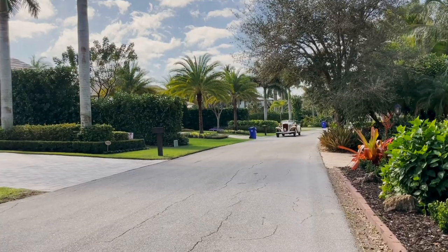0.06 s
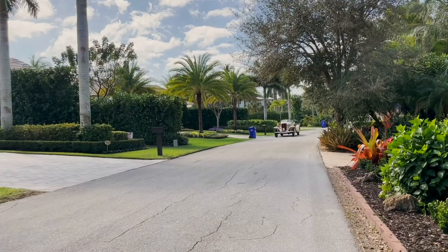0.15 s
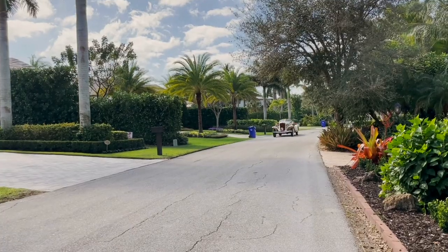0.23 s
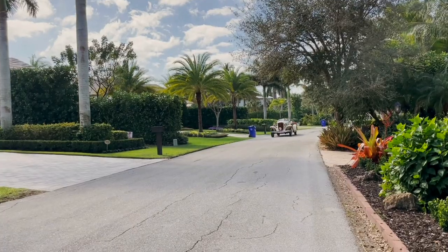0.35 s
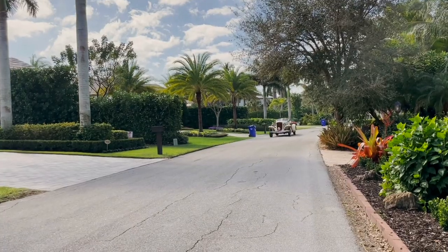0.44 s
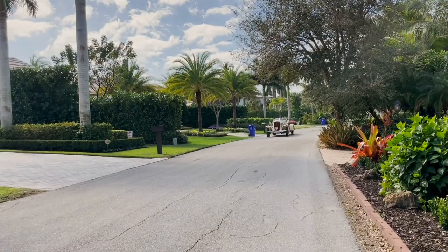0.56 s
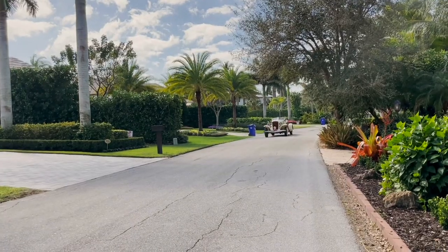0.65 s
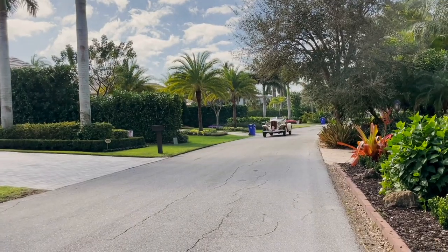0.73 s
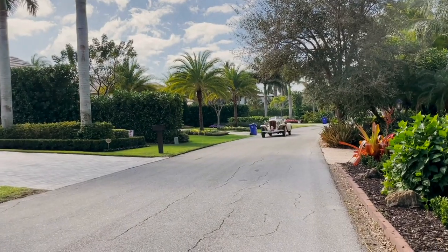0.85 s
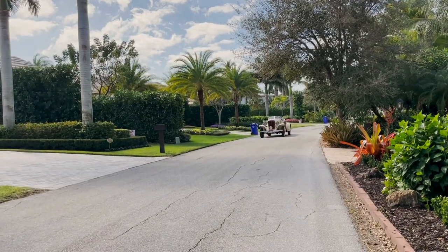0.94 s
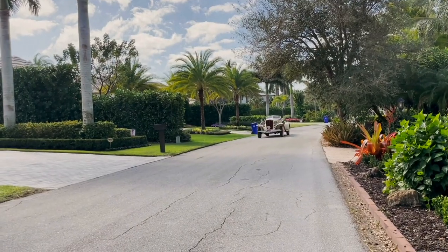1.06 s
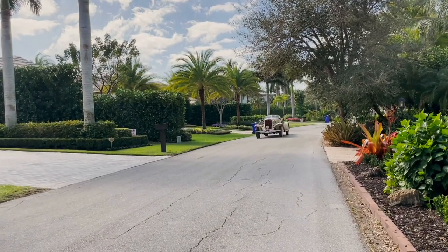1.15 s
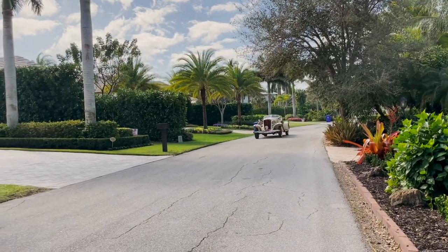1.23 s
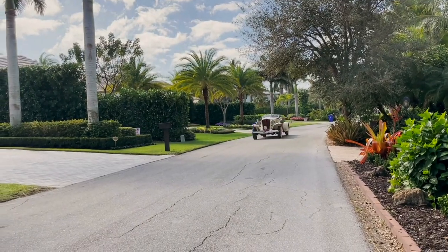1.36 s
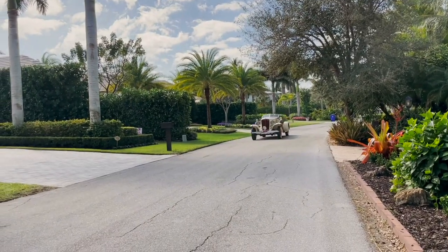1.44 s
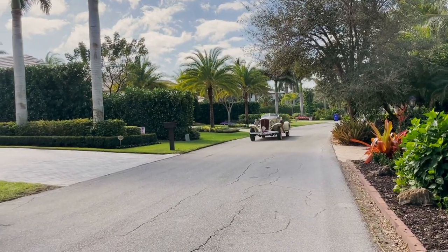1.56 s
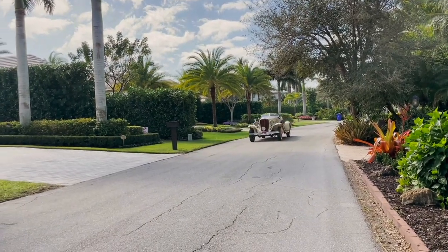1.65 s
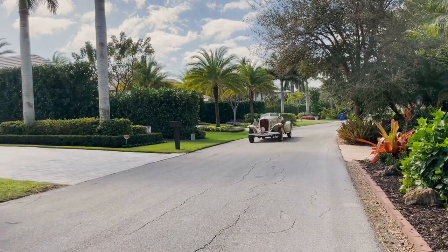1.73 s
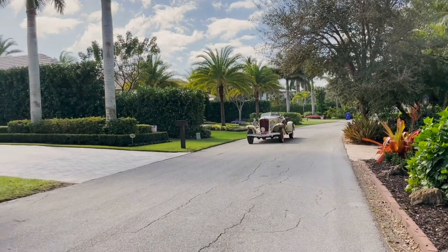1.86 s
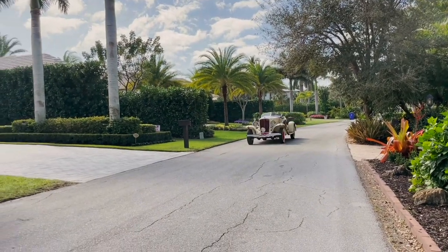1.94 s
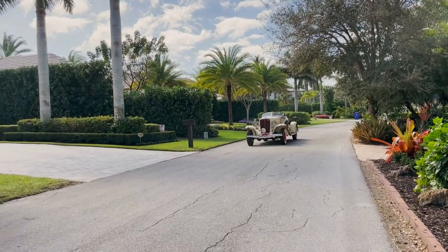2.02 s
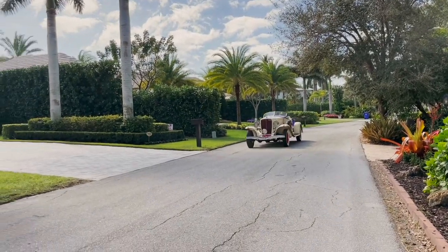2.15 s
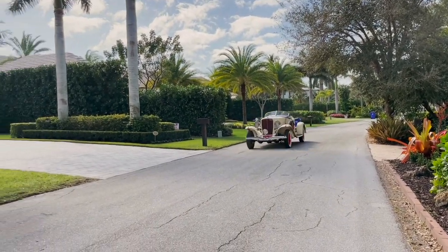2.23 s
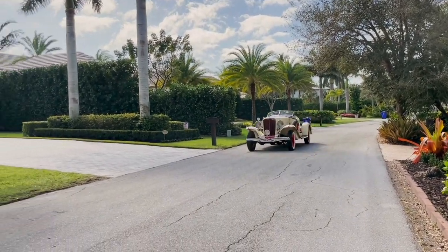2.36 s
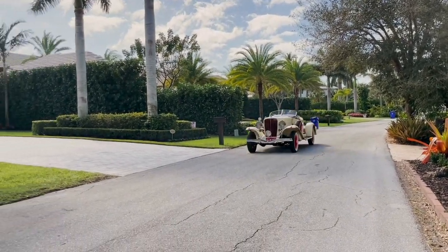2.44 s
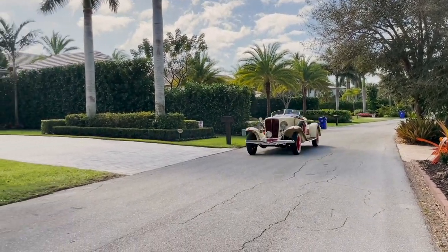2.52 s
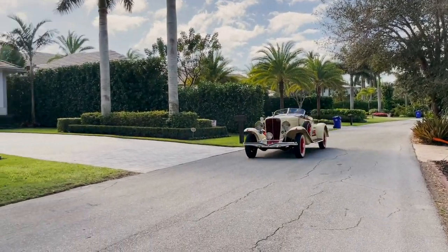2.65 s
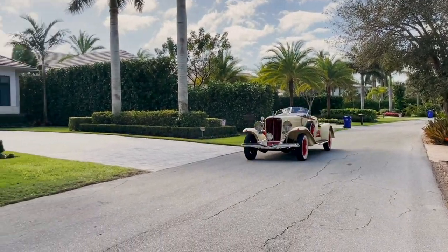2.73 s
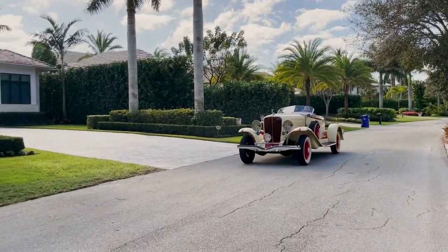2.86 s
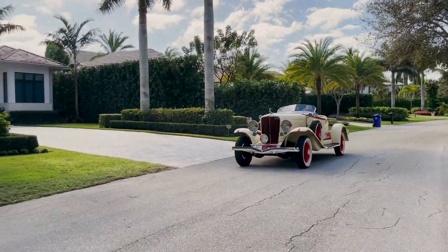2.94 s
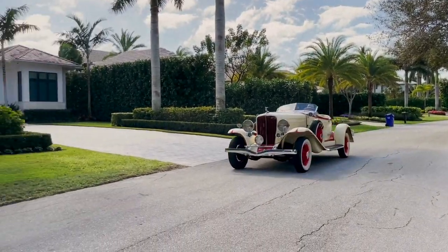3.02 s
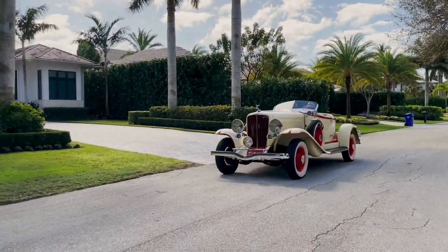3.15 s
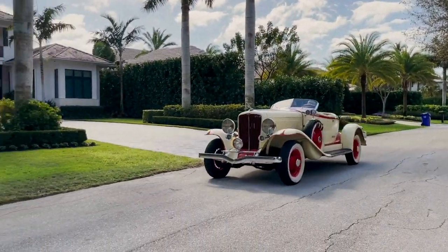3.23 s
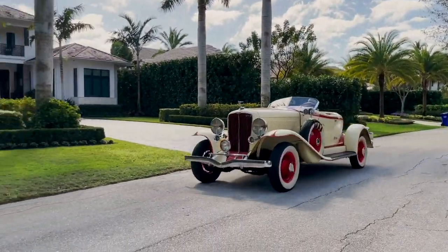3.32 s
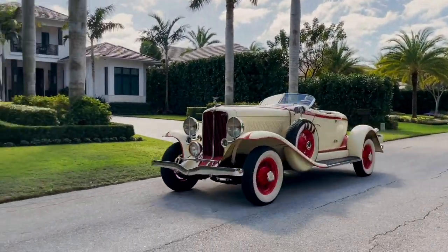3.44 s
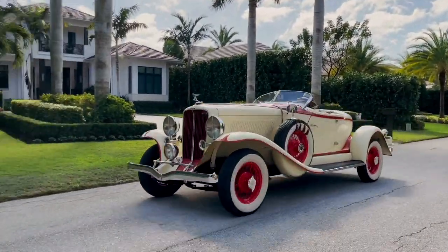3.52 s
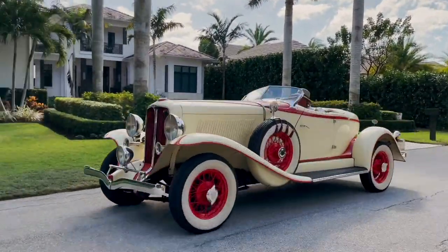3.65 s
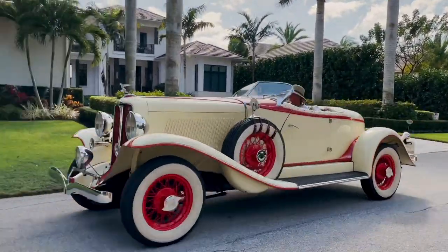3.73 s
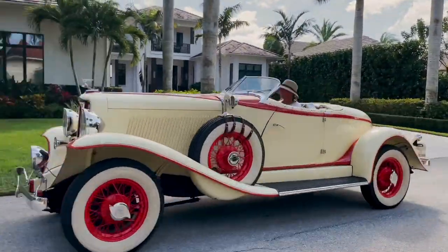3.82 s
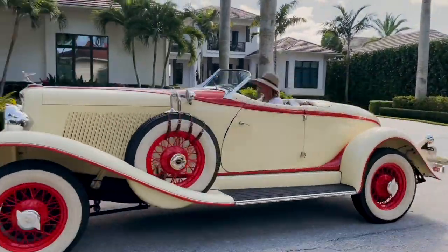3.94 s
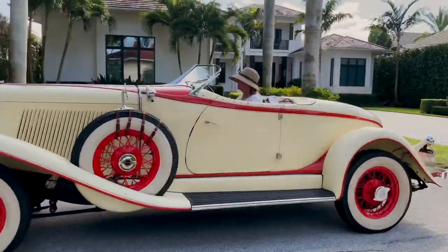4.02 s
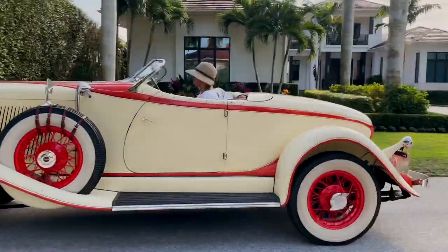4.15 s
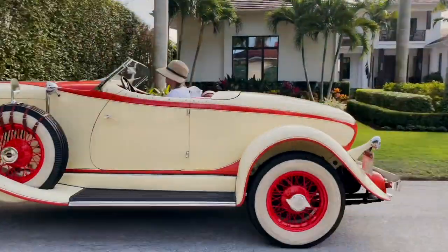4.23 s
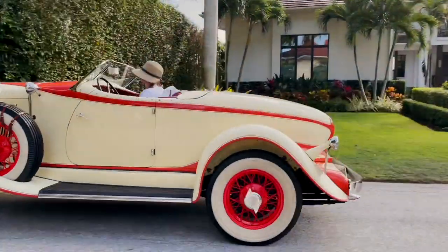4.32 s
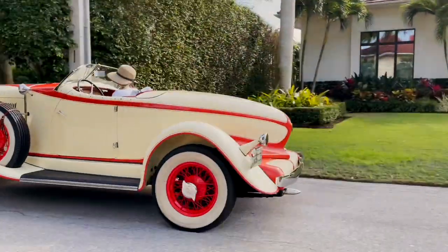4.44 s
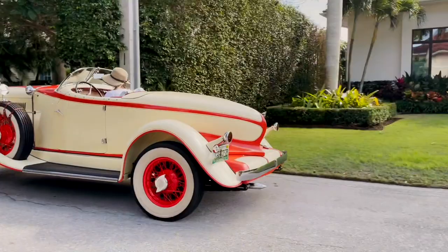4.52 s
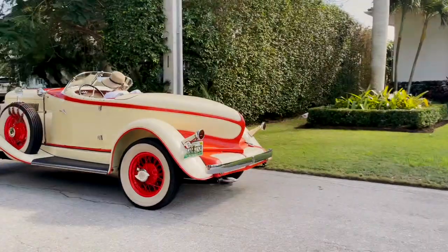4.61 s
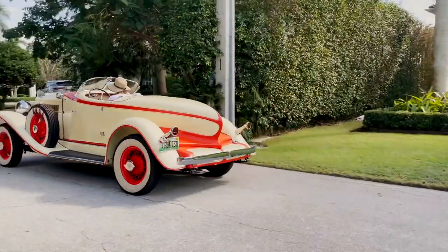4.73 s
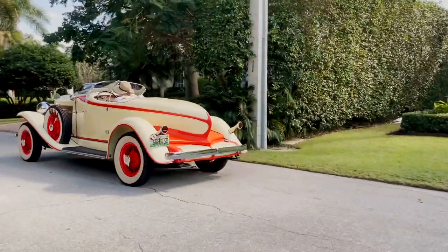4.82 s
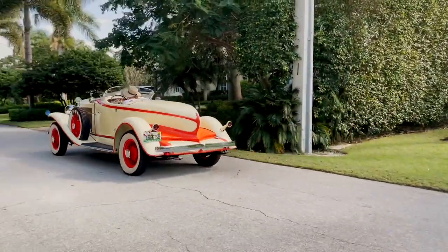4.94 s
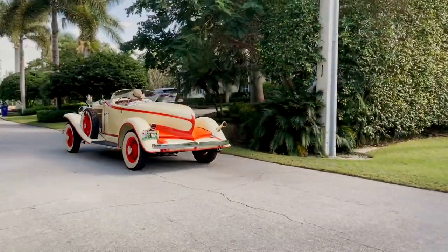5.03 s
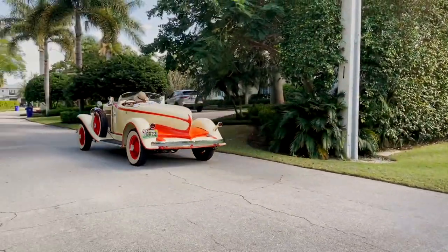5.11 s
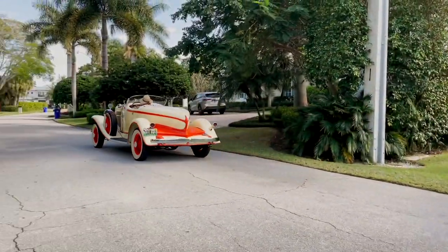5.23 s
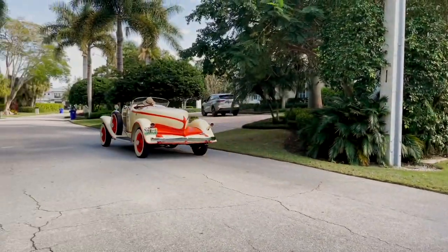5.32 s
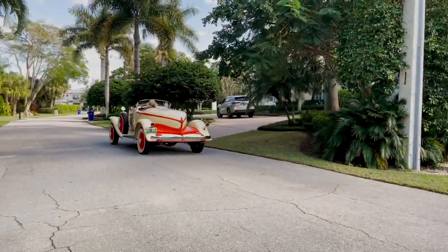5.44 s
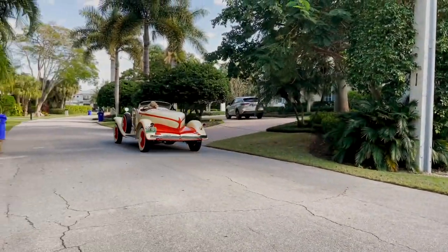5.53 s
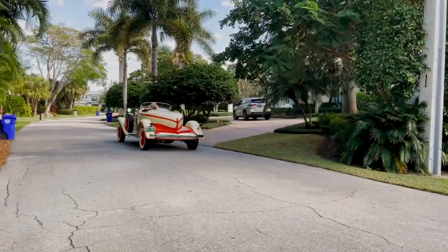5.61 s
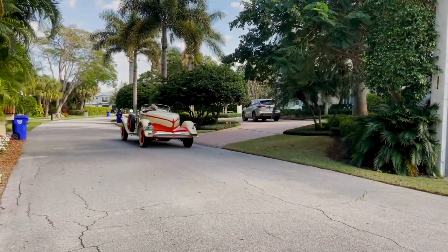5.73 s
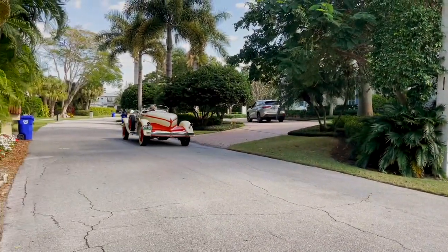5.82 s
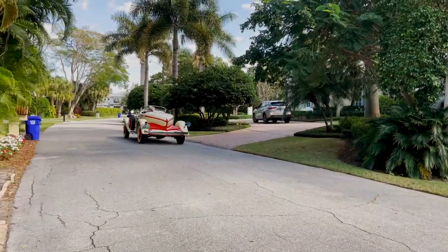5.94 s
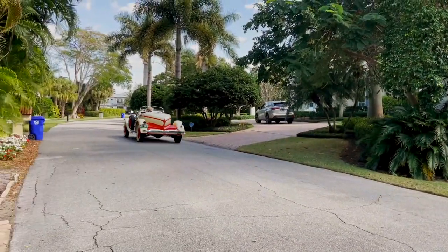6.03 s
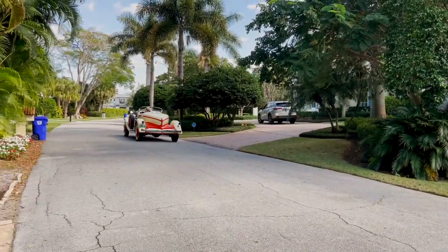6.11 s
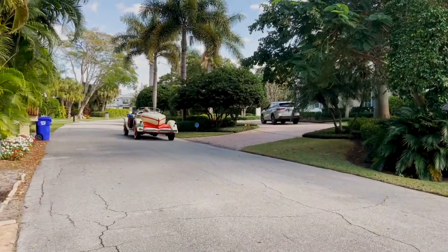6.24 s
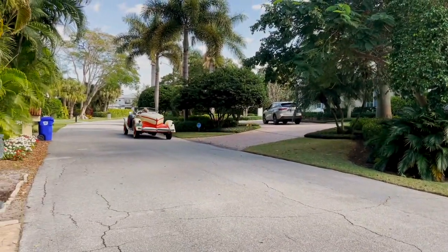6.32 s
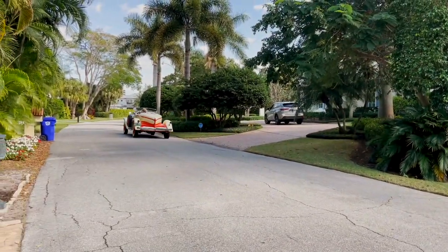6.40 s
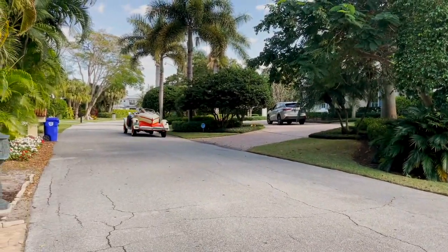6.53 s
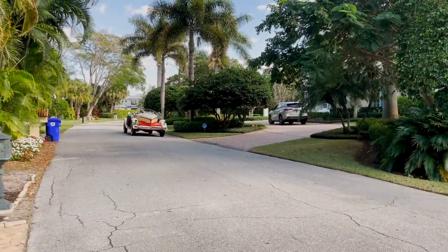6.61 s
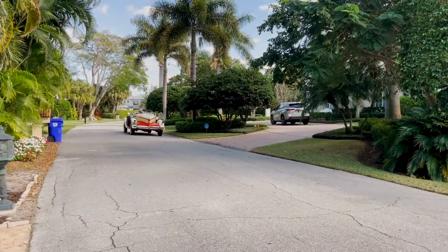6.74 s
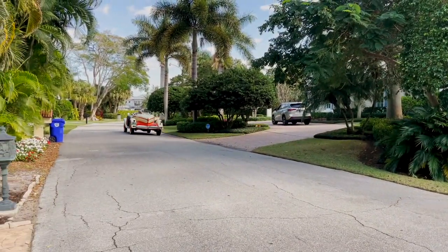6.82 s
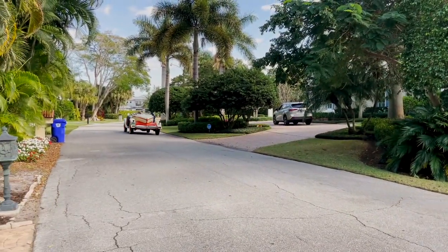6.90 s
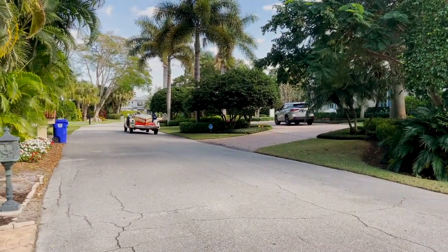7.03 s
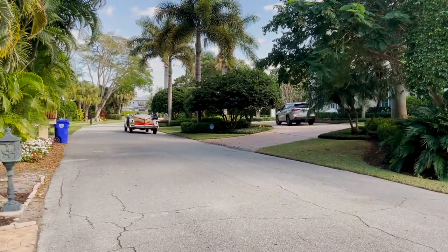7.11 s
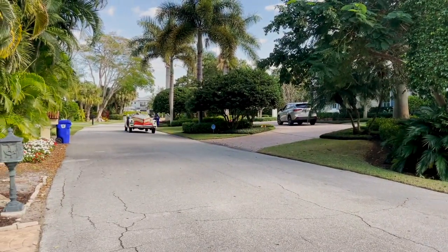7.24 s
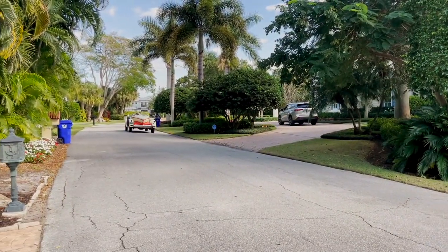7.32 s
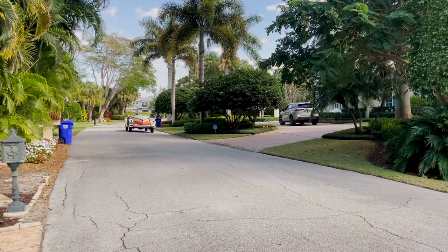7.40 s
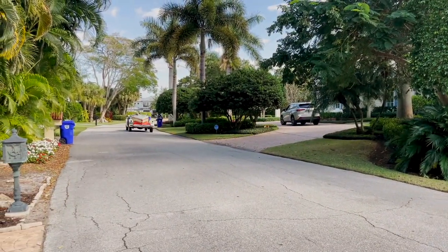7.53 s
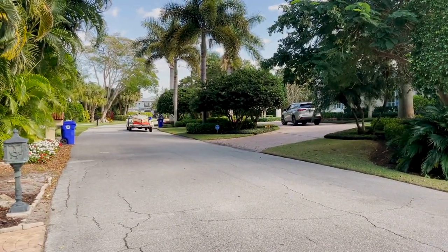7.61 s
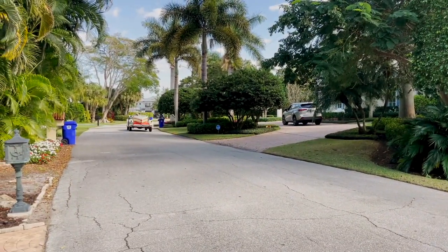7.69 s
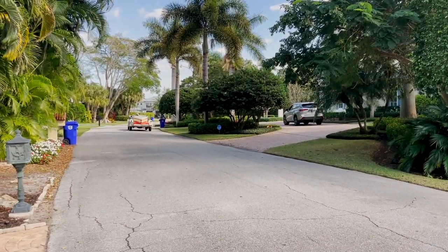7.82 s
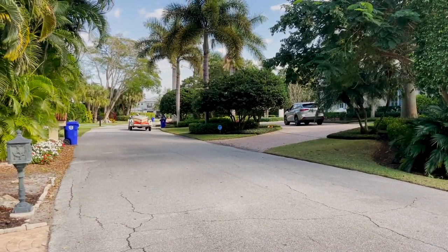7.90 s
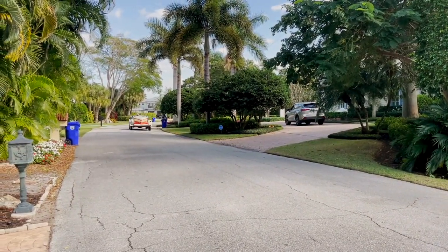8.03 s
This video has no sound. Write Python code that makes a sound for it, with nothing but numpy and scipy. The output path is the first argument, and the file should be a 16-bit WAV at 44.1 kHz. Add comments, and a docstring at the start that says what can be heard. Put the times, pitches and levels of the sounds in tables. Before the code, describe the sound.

Heard from the roadside, an old car accelerates closer with a hollow engine hum and tyre noise while gusts thump on the microphone. It sweeps past at close range, then the tail pipe takes over with a low, steady drone and a short run of raspy sputters. The sound recedes down the quiet street, leaving a thin, faint bird call and one last puff of wind.

```python
"""A quiet street: a vintage straight-eight car accelerates, passes close by and drives away.
Tyres and engine bay rush as it nears (coloured noise, hollow hums). Once the body clears the tail pipe,
the exhaust drones (engine orders) and chuffs (gas bursts ringing the pipe's modes).
A breeze buffets the microphone; a far bird calls thinly at the end."""
import sys
import numpy as np
from scipy import signal
from scipy.fft import rfft, irfft
from scipy.io import wavfile
from scipy.ndimage import uniform_filter1d

SR = 44100
rng = np.random.default_rng(int(sys.argv[2]) if len(sys.argv) > 2 else 0)


def store_pcm(level_fs):
    """Save levels as 16-bit WAV."""
    pcm = np.round(np.clip(level_fs, -1, 1) * 32767).astype(np.int16)
    wavfile.write(sys.argv[1], SR, np.atleast_2d(pcm).T)


N = 355578
T = np.arange(N) / SR
PASS_S, SPEED_M_PER_S, GAP_M, SOUND_M_PER_S = 4.3, 6.9, 3.8, 343

# Left-right likeness of the noise. Each row: frequency in Hz, coherence 0-1.
COHERENCE = [(60, 0.8), (150, 0.88), (380, 0.92), (950, 0.75), (2400, 0.63), (4800, 0.7), (6000, 0.28)]
# Noise spectra. Each row: frequency in Hz, relative density in dB.
WIND_SPECTRUM = [(20, -31), (35, -42), (50, 4), (75, 3.5), (110, 0.5), (170, -6.5), (280, -11), (450, -36),
                 (900, -87)]
FIZZ_SPECTRUM = [(8500, -64), (10000, 7), (11000, 9.5), (15000, 8), (16000, 2)]
AIR_SPECTRUM = [(6000, -36), (7100, -1.5), (8300, 2.5), (9500, -1.5), (10600, -5), (11500, -17),
                (12400, -40)]
WHIRR_SPECTRUM = [(1300, -20), (2100, 2.5), (2600, 0.5), (3200, -8), (4900, -6.5), (5700, -12), (7000, -10),
                  (8200, -27), (9000, -70)]
APPROACH_SPECTRUM = [(70, -39), (160, -2), (220, -4.5), (300, -3.5), (390, -6.5), (590, -5.5), (790, -9),
                     (1000, -7), (1300, -12.5), (2150, -18), (3200, -28.5), (4800, -26.5), (6000, -45.5),
                     (7200, -39), (9000, -92)]
CLOSE_SPECTRUM = [(120, -3), (200, -3), (293, -7.5), (387, -4.5), (550, -3.5), (714, -3.5), (810, -6.5),
                  (1260, -3.5), (2970, -25), (5000, -37.5), (5650, -45.5), (7010, -40), (7800, -41.5),
                  (10100, -114), (17200, -120)]
WAKE_SPECTRUM = [(60, -11), (130, 6.5), (260, 1.5), (380, 1.5), (520, 2.5), (750, -0.5), (1000, 0),
                 (1130, -5), (1300, -2.5), (1500, -5.5), (2000, -14), (2700, -21), (3500, -21), (5000, -31),
                 (7500, -38.5), (9500, -74)]
# Bird call. Each row: time in seconds, lower partial in Hz, upper partial in Hz, level in dB.
BIRD_CALL = [(7.11, 5900, 7300, -100), (7.15, 5650, 6900, -74), (7.2, 5140, 6830, -77),
             (7.35, 4930, 6270, -75), (7.6, 4950, 6420, -77), (7.7, 4900, 6450, -100)]
# Gusts. Each row: peak time in seconds, half length in seconds, level in dB.
WIND_GUSTS = [(1.76, 0.32, -33), (2.25, 0.34, -30.5), (2.72, 0.2, -28.5), (3.97, 0.33, -27),
              (8.05, 0.15, -39)]
# Single eddies. Each row: time in seconds, peak in dB, pitch in Hz.
WIND_EDDIES = [(0.048, -29, 110), (.615, -31, 98.6), (.706, -29.5, 122), (0.886, -31, 125),
               (1.118, -30, 111), (1.559, -26, 124), (1.789, -20, 136), (2.16, -16, 112.4),
               (2.181, -22.5, 182), (2.431, -19.5, 96), (2.594, -23, 86.5), (2.677, -16.5, 117),
               (2.747, -14, 81), (2.783, -26, 91), (2.833, -19.5, 85.5), (3.149, -25, 101),
               (3.596, -15.5, 62.3), (3.821, -18, 140), (4.089, -18.5, 56.5), (8.005, -24.5, 76.5),
               (8.055, -19.5, 114)]
# Finest hiss. Each row: time in seconds, level in dB.
FIZZ_DB = [(0, -65), (.3, -67), (1, -62.5), (1.75, -59), (2.4, -64.5), (2.75, -66.5), (3.5, -65),
           (4.2, -53), (4.6, -51), (5.4, -59.5), (6, -69), (6.5, -77), (7.5, -77.5), (8, -81)]
# Bright ticks. Each row: start in seconds, peak in dB.
TICK_HITS = [(2.518, -47), (3.0402, -46), (3.1794, -49), (3.8472, -41), (7.0204, -59), (7.5028, -60)]
# Hums of engine bay, tyres and tail. Each row: peak time in seconds, half length in seconds,
# pitch in Hz, width in Hz, level in dB.
CAR_HUMS = [(1.003, 1.4, 602, 171, -42.5), (1.1, 1.6, 2184, 130, -56.5), (1.3, 1.1, 4920, 200, -63.5),
            (2, .25, 5350, 130, -62), (1.9, 0.63, 297, 70, -40.5), (2.6, 2, 1535, 200, -49.5),
            (2.8, 0.9, 2004, 150, -49.5), (3.103, .6, 1024, 140, -41.5), (3.7, .35, 1180, 450, -35),
            (4.102, 0.34, 730, 141, -36), (4.152, 0.38, 214, 70, -34), (6.495, 2.4, 1293, 70.5, -54),
            (6.7, 1.1, 216, 80, -44.5)]
# Lag of the right microphone port. Each row: time in seconds, delay in seconds.
RIGHT_LAG_S = [(0, 0), (4.7, 0), (5.3, 4e-5), (8, 5e-5)]
# Engine speed. Each row: time in seconds, firings per second.
FIRING_HZ = [(0, 79.2), (1, 86.8), (3.7, 112), (4.6, 111.2), (5.3, 112.1), (5.85, 113.9), (8.1, 113.2)]
# Engine load. Each row: time in seconds, load 0-1.
ENGINE_LOAD = [(0, 0.76), (1.75, 1), (2.15, 0.97), (3.1, 0.42)]
# Radiation by part. Each row: offset behind the car's middle in metres, closest distance in metres,
# base level in dB, loss per doubled distance in dB, rearward gain in dB, full-load gain in dB.
RADIATION = { "roar": (-2, 4, -30.5, 6, 0.2, 2.5), "wake": (3.5, 5.5, -32, 9.5, -2, 3),
             "whirr": (4, 5, -48.5, 10.5, -5, 15.5), "block": (-0.5, 3, -49.5, 5.5, -4.5, 15),
             "pipe": (1.3, 6, -20, 12.5, 0.35, 2.5), "silencer": (1.5, 2.5, -23, 8.5, 4, -1.6),
             "burble": (7, 0, -51, 0.5, 13.5, -6), "rasp": (3.5, 3, -44, 10, -3.5, -2.5),
             "spit": (3.5, 2.5, -44.5, 13, 3.5, 1), "sizzle": (4, 2.5, -56, 17.5, 0.5, -3), }
# Engine orders. Each row: multiple of the eight-firing cycle, relative level in dB.
BLOCK_LINES = [(14, 0.5), (20, 4.5), (22, -11), (24, -3.5), (26, -5), (28, 1.5), (30, -5), (35, -12),
               (37, 1.5), (39, 6), (51, 0.5), (52, -7), (54, -9), (56, 2)]
SILENCER_LINES = [(10, -15.5), (11, -22.5), (12, -7), (13, -11), (14, -15), (15, -12.5), (16, -15),
                  (17, -12), (18, -13), (19, -18.5), (20, -13.5), (21, -12), (22, -19), (23, -25),
                  (25, -26), (26, -28), (28, -26), (31, -31), (36, -31), (37, -27), (38, -31.5),
                  (43, -25.5)]
PIPE_LINES = [(4, -4), (7, -22.5), (8, 1), (10, -25)]
# Swell of the pipe's boom. Each row: time in seconds, gain in dB.
BOOM_DB = [(5.3, 0.5), (5.85, 4), (6.1, -1), (6.7, -2.5), (7.05, 4), (7.45, -1), (7.72, -10), (8.05, 4)]
# Accents of a cycle's four chuffs. Each entry: gain in dB.
ACCENT_DB = [3.5, 0, 0, 2.5]
# Tail pipe modes. Each row: pitch in Hz, width in Hz, relative level in dB.
RASP_MODES = [(1630, 97, 2.5), (1916, 98, 4), (2310, 56, -3), (2565, 110, -2)]
SPIT_MODES = [(2580, 230, -4.5), (3535, 200, 5), (3871, 270, 0), (4410, 330, -1), (5060, 440, -11)]
SIZZLE_MODES = [(6820, 670, 0)]
# Spells of harder chuffing. Each row: start in seconds, length in seconds,
# rasp, spit and sizzle gains in dB, spit pitch factor.
CHUFF_SPELLS = [(4.59, 0.21, 12, 4.5, -3, 1.09), (4.813, 0.17, 11.5, 1, 1, 1.1),
                (5.043, .3, -2, 5.5, 10.5, 1.007), (5.33, 0.22, -5, 5.5, -1, 1.02),
                (5.8, .48, 0, 4.5, 0, .98)]
# Snaps and exhaust pops. Each row: start in seconds, peak in dB, pitch in Hz, width in Hz.
EXHAUST_POPS = [(2.777, -33, 3200, 4360), (4.207, -27, 4500, 2400), (4.651, -19.5, 1910, 500),
                (4.684, -26, 3780, 500), (4.739, -32, 3930, 400), (4.757, -12.5, 1820, 500),
                (4.757, -23.5, 4220, 1200), (4.797, -22, 660, 160), (4.830, -23.5, 4440, 400),
                (4.902, -24, 1920, 400), (5.031, -37, 6300, 900), (5.049, -26.5, 2500, 700),
                (5.121, -30, 3700, 600), (5.195, -27, 3860, 600), (5.266, -30, 3700, 900)]


def gain_of(db):
    """Decibels to a factor."""
    return 10 ** (np.asarray(db) / 20)


def unit_rms(x):
    """Scale to rms 1."""
    return x / np.sqrt(np.mean(x ** 2) + 1e-20)


def steadied(x):
    """Hold the short-term rms at 1."""
    return x / np.sqrt(abs(uniform_filter1d(x ** 2, size=200, axis=-1)) + 1e-12)


def step(x):
    """Soft 0-to-1 step at x = 0."""
    return .5 + .5 * np.tanh(x)


def curve(rows, column=1):
    """One column of a time table at every sample."""
    rows = np.array(rows, float)
    return np.interp(T, rows[:, 0], rows[:, column])


def spectrum_at(rows, hz):
    """Interpolate a table over log frequency."""
    knots_hz, values = np.transpose(rows)
    return np.interp(np.log(hz + 1), np.log(knots_hz + 1), values)


def wander(rate_hz):
    """Slow random drift, rms 1."""
    coarse_s = T[::256]
    hz = np.fft.rfftfreq(len(coarse_s), coarse_s[1])
    spectrum = rfft(rng.standard_normal(len(coarse_s))) / (1 + (hz / rate_hz) ** 4)
    return np.interp(T, coarse_s, unit_rms(irfft(spectrum, len(coarse_s))))


def noise(spectrum, patchy_db, band_hz=None):
    """Coloured stereo noise with drifting patches; rms 1 overall or within a band."""
    frames, hz = N // 512 + 5, np.fft.rfftfreq(2048, 1 / SR)
    left_re, left_im, other_re, other_im, patches = rng.standard_normal((5, frames, len(hz)))
    patches = uniform_filter1d(patches, size=5, axis=0)
    patches = unit_rms(uniform_filter1d(patches, size=16, axis=1))
    coherence = spectrum_at(COHERENCE, hz)
    left = left_re + 1j * left_im
    right = coherence * left + np.sqrt(1 - coherence ** 2) * (other_re + 1j * other_im)
    shape = gain_of(spectrum_at(spectrum, hz))
    bins = np.array([left, right]) * shape * gain_of(patchy_db * patches)
    x = unit_rms(signal.istft(bins.swapaxes(1, 2), nperseg=2048, noverlap=1536)[1][:, :N])
    if band_hz is None:
        return x
    in_band = (hz > band_hz[0]) & (hz < band_hz[1])
    return x * np.linalg.norm(shape) / np.linalg.norm(shape[in_band])


def resonate(x, hz, width_hz):
    """Two-pole, unity-gain resonance; its pitch may move."""
    carrier = np.exp(2j * np.pi * np.cumsum(hz * np.ones(x.shape[-1])) / SR)
    pole = np.exp(-np.pi * width_hz / SR)
    baseband = signal.lfilter([(1 - pole) ** 2], [1, -2 * pole, pole * pole], x / carrier + 1e-18)
    return 2 * (carrier * baseband).real


def cracks(rows, decay_s):
    """Abrupt noise bursts, each in one broad resonance."""
    out, age = np.zeros(N), np.arange(SR // 20) / SR / decay_s
    for start_s, db, hz, width_hz in rows:
        crack = resonate(rng.standard_normal(len(age)) * age * np.exp(-age), hz, width_hz)
        out[round(start_s * SR):][:len(age)] += gain_of(db) * crack / abs(crack).max()
    return out


def bird(blur_hz=260):
    """Two faint, breathy partials slide down and hold."""
    lower = unit_rms(resonate(rng.standard_normal(N), curve(BIRD_CALL, column=1), blur_hz))
    upper = unit_rms(resonate(rng.standard_normal(N), curve(BIRD_CALL, column=2), blur_hz))
    return (gain_of(1) * lower + upper) * gain_of(curve(BIRD_CALL, column=3))


def wind(lull_db=-44, lumpy_db=3.0, eddy_cycles=0.77):
    """Low turbulence at the microphone: gusts over a lull, plus single eddies."""
    gust_power = sum((gain_of(db) * np.exp(-((T - peak_s) / half_s) ** 2)) ** 2
                     for peak_s, half_s, db in WIND_GUSTS)
    level = np.sqrt(gain_of(lull_db) ** 2 + gust_power)
    out = noise(WIND_SPECTRUM, patchy_db=1.5) * level * gain_of(lumpy_db * wander(rate_hz=7.8))
    for peak_s, db, hz in WIND_EDDIES:
        swing = (T - peak_s) * hz
        out += gain_of(db) * np.cos(2 * np.pi * swing) * np.exp(-(swing / eddy_cycles) ** 2)
    return out


def street_echo(x, t60_s=0.16, wet_db=-13):
    """Add the short, thin scatter from hedges and house fronts."""
    t = np.arange(SR // 2) / SR
    tail = rng.standard_normal((2, len(t))) * gain_of(-60 * t / t60_s) * (t > .006)
    tail = signal.sosfilt(signal.butter(2, 400, "high", fs=SR, output="sos"), tail)
    return x + gain_of(wet_db) * signal.fftconvolve(x, tail / np.linalg.norm(tail[0]), axes=1)[:, :N]


def fizz(grains_per_s=350, spread_db=4, grit_db=-10, air_db=2.0, air_lag_s=0.083):
    """Finest hiss of the pass: a smooth centre with grit, trailed by a wide, airy band."""
    grains = (rng.random(N) < grains_per_s / SR) * rng.standard_normal(N)
    grains *= gain_of(spread_db * np.minimum(rng.exponential(1, N), 4))
    grit = unit_rms(resonate(grains, hz=16400, width_hz=2700))
    smooth = unit_rms(noise(FIZZ_SPECTRUM, patchy_db=.4).mean(0))
    level_db = curve(FIZZ_DB)
    centre = (smooth + gain_of(grit_db) * grit) * gain_of(level_db)
    air = unit_rms(noise(AIR_SPECTRUM, patchy_db=0.5)[0])
    air *= gain_of(air_db + np.interp(T - air_lag_s, T, level_db))
    return centre + np.outer([1, -1], air)


def ticks(hz=12800, width_hz=3000):
    """Tiny bright cracks."""
    return cracks([(start_s, db, hz, width_hz) for start_s, db in TICK_HITS], decay_s=0.00024)


def hums():
    """Hollow resonances; each swells and fades as the car shows another side."""
    out = 0
    for peak_s, half_s, hz, width_hz, db in CAR_HUMS:
        swell = gain_of(db) * np.exp(-((T - peak_s) / half_s) ** 2)
        out += swell * unit_rms(resonate(rng.standard_normal(N), hz, width_hz))
    return out


def past_m():
    """Position of the car's middle past the microphone; negative on approach."""
    return SPEED_M_PER_S * (T - PASS_S)


def part_gain(part):
    """Gain of one part from distance, side shown and engine load."""
    behind_m, closest_m, base_db, loss_db, rear_db, load_db = RADIATION[part]
    along_m = past_m() - behind_m
    distance_m = np.hypot(along_m, closest_m)
    spreading_db = loss_db * np.log2(distance_m / closest_m)
    facing_db = rear_db * along_m / distance_m
    return gain_of(base_db - spreading_db + facing_db + load_db * curve(ENGINE_LOAD))


def engine_cycles(zero_at_s=4.7561):
    """Doppler-shifted count of four-stroke cycles, eight firings each."""
    receding_m_per_s = SPEED_M_PER_S * past_m() / np.hypot(past_m(), GAP_M)
    heard_hz = curve(FIRING_HZ) * (1 - receding_m_per_s / SOUND_M_PER_S)
    cycles = np.cumsum(heard_hz) / SR / 8
    return cycles - np.interp(zero_at_s, T, cycles)


def rolling(cycles, front_throb=0.035, wake_throb=0.17, wake_surge=0.095, wash_db=-45.5):
    """Tyre and engine bay roar over the street's wash; the wake pulses per firing and per cycle."""
    near, past = np.interp(T, [1.6, 2.9], [0, 1]), np.interp(T, [3.8, 4.6], [0, 1])
    firing = np.cos(2 * np.pi * 8 * cycles)
    throb = 1 + front_throb * firing
    front = part_gain("roar") * throb
    wake = part_gain("wake") * (1 + wake_throb * firing) * (1 - wake_surge * np.cos(2 * np.pi * cycles))
    roar = 0
    for spectrum, share, level in [(APPROACH_SPECTRUM, 1 - near, front),
                                   (CLOSE_SPECTRUM, near * (1 - past), front),
                                   (WAKE_SPECTRUM, past, wake)]:
        rush = noise(spectrum, patchy_db=0.96, band_hz=(350, 1450))
        roar += np.sqrt(share) * np.hypot(level, gain_of(wash_db)) * rush
    return roar + noise(WHIRR_SPECTRUM, patchy_db=2.5) * part_gain("whirr") * throb


def chuff_spells(edge_s=0.0099):
    """Rasp, spit and sizzle gains and spit pitch factor; each spell switches in, holds, drops out."""
    levels, pitch = np.array([part_gain("rasp"), part_gain("spit"), part_gain("sizzle")]), 1
    for start_s, length_s, *gains_db, factor in CHUFF_SPELLS:
        on = step((T - start_s) / edge_s) * step((start_s + length_s - T) / edge_s)
        levels *= gain_of(np.outer(gains_db, on))
        pitch *= factor ** on
    return (*levels, pitch)


def chuffs(cycles, rise_beats=0.15, floor=0.15, stereo_spread=0.36, scatter_db=2, detune=.03):
    """Every second firing spits gas that rings the pipe's modes, a little differently each time."""
    beats = cycles * len(ACCENT_DB)
    index, age = np.floor(beats).astype(int), beats % 1 / rise_beats
    accent = gain_of(np.take(ACCENT_DB, index, mode="wrap"))
    burst = accent * (floor + (age * np.exp(1 - age)) ** 2)
    rasp, spit, sizzle, pitch = chuff_spells()
    out = 0
    for modes, level, shift in [(RASP_MODES, rasp, 1), (SPIT_MODES, spit, pitch),
                                (SIZZLE_MODES, sizzle, 1)]:
        mid, side = rng.standard_normal((2, N))
        gas = np.array([mid + stereo_spread * side, mid - stereo_spread * side])
        pipe = 0
        for hz, width_hz, db in modes:
            strength, tuning = rng.standard_normal((2, 1024))[:, index]  # one draw per chuff
            ring = resonate(gas, hz * shift * (1 + detune * tuning), width_hz)
            pipe += steadied(ring) * gain_of(db + scatter_db * strength)
        out += unit_rms(pipe * burst) * level
    return out


def exhaust_rattle(cycles, top_hz=7600):
    """Chuffs and pops, cut off above the pipe's highest mode."""
    rattle = chuffs(cycles) + cracks(EXHAUST_POPS, decay_s=0.0014)
    return signal.sosfilt(signal.butter(8, top_hz, fs=SR, output="sos"), rattle)


def engine_orders(cycles, lines, waver, waver_hz, lead_cycles=.028, sweep_cycles_per_order=.0443):
    """Orders up to the firing rate align into thuds; higher ones exit later and sweep upwards."""
    out = 0
    for order, db in lines:
        drift = wander(waver_hz) + 1j * wander(waver_hz)
        amplitude = gain_of(db) * (1 + waver * drift / np.sqrt(gain_of(db)))  # weak lines waver most
        phase_lag = sweep_cycles_per_order * order ** 2 / 2 if order > 8 else 0
        phase = order * (cycles + lead_cycles) - phase_lag
        out -= (amplitude * np.exp(2j * np.pi * phase)).real
    return unit_rms(out)


def drone(cycles, screen_db=14, clear_m=0.53, edge_m=1):
    """Block hums ahead, silencer drones beside, pipe booms behind once the body stops screening it."""
    boom = gain_of(curve(BOOM_DB) - screen_db * step((clear_m - past_m()) / edge_m))
    pipe = engine_orders(cycles, PIPE_LINES, waver=0.065, waver_hz=4.7) * part_gain("pipe") * boom
    silencer = engine_orders(cycles, SILENCER_LINES, waver=0.094, waver_hz=1.5) * part_gain("silencer")
    block = engine_orders(cycles, BLOCK_LINES, waver=0.22, waver_hz=3.2) * part_gain("block")
    return pipe + silencer + block


def scene(pan_ahead_db=-1.4, pan_past_db=-1.0):
    """Car with street echo, far bird, wind."""
    cycles = engine_cycles()
    left, right = street_echo(drone(cycles) + exhaust_rattle(cycles) + rolling(cycles) + hums())
    right = np.interp(T - curve(RIGHT_LAG_S), T, right)  # the car leaves to the left
    pan_db = pan_ahead_db + (pan_past_db - pan_ahead_db) * step(past_m() / GAP_M)  # left minus right
    car = np.array([left, right]) * gain_of(np.outer([.5, -.5], pan_db))
    return car + fizz() + ticks() + bird() + wind()


def record(dry, edge_hz=15900):
    """Steep low-pass band limit."""
    taps = signal.firwin(511, edge_hz, window=("kaiser", 9), fs=SR)
    return signal.oaconvolve(dry, taps[None], "same")


dry = scene()
out = record(dry)
store_pcm(out)
```